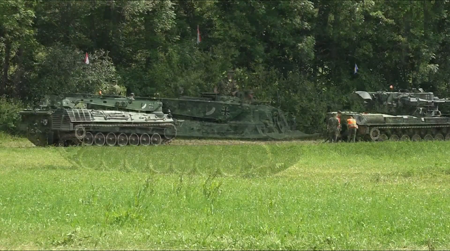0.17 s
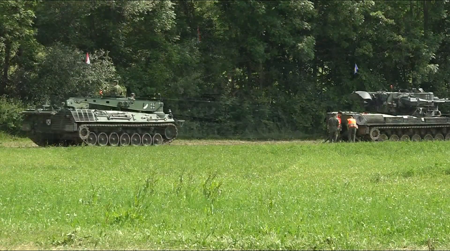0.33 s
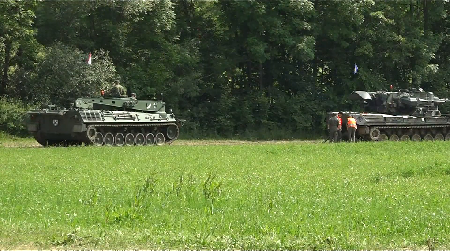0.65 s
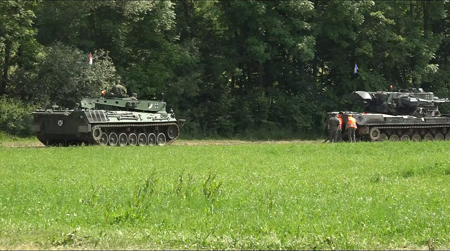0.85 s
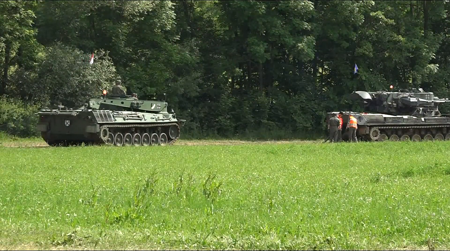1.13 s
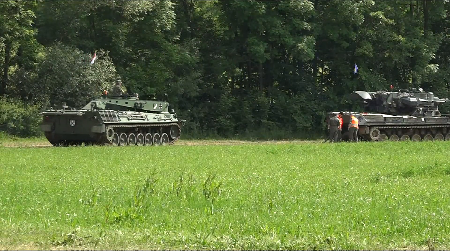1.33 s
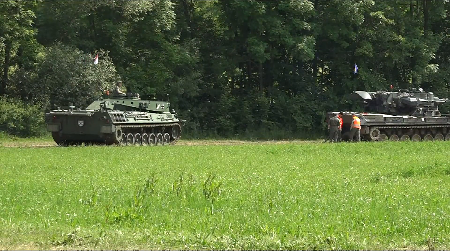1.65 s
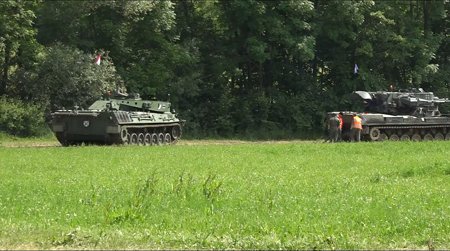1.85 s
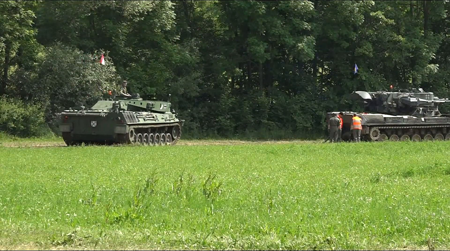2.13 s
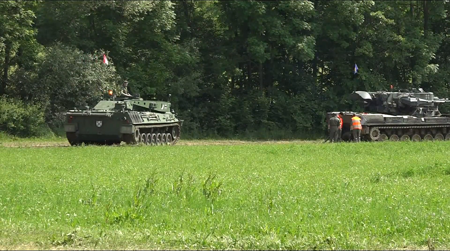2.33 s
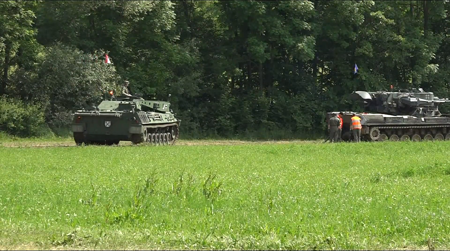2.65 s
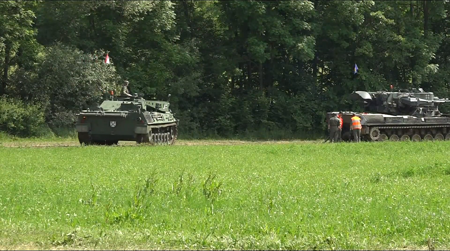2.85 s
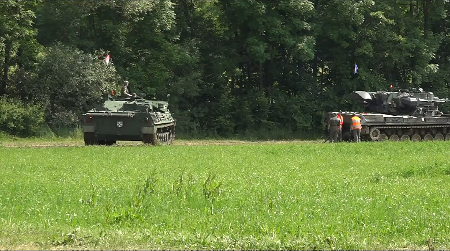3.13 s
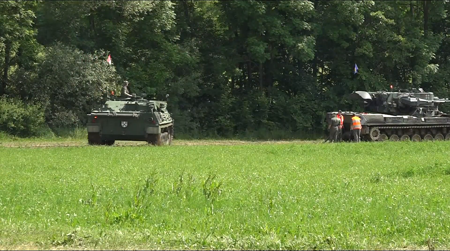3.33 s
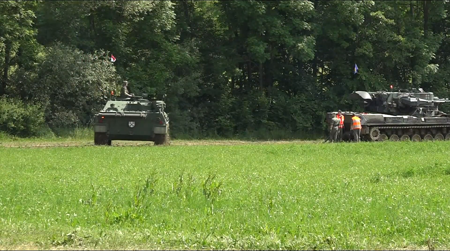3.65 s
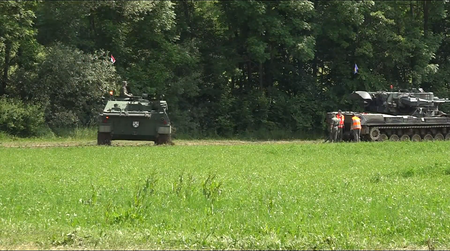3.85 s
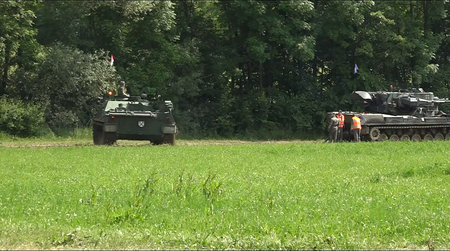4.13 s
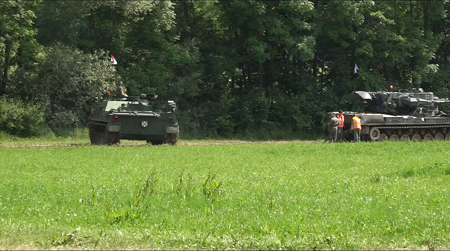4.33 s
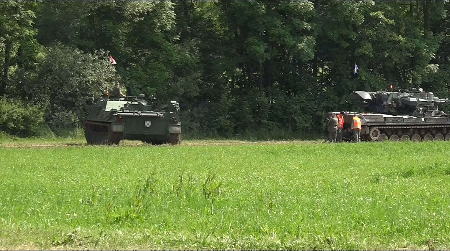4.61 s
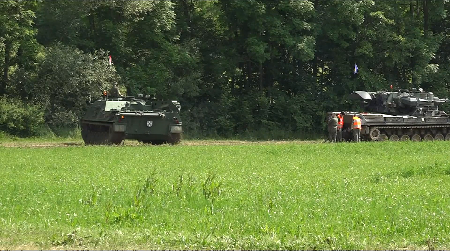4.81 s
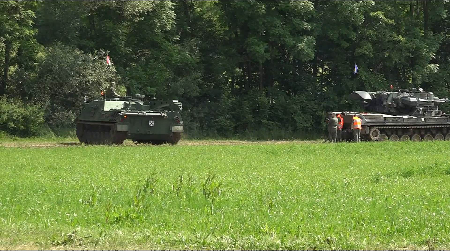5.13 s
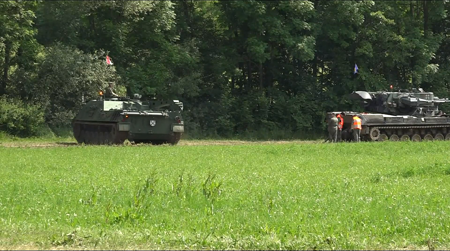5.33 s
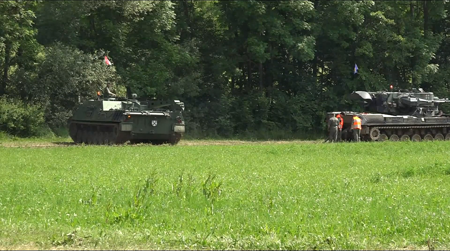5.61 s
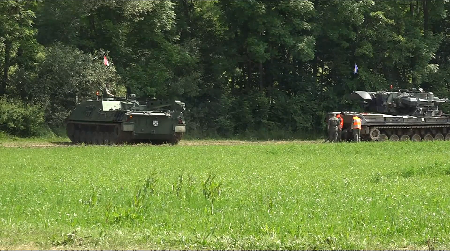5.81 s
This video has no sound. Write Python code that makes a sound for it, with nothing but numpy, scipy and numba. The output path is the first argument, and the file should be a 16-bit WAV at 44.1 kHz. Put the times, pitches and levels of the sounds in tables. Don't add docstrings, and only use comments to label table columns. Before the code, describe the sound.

Loud throaty diesel drone of a turning armoured tracked vehicle outdoors, with rumbling links, metallic slaps, short squeaks and thin whines.

```python
import sys
import numpy as np
from scipy import signal
from scipy.fft import rfft, irfft
from scipy.io import wavfile
from scipy.ndimage import uniform_filter1d
from numba import njit

SR = 44100
rng = np.random.default_rng(int(sys.argv[2]) if len(sys.argv) > 2 else 0)


def transcribe(signal):
    frames = np.atleast_2d(signal).T
    limited = np.clip(frames, -1, 1)
    pcm = np.round(limited * 32767).astype(np.int16)
    wavfile.write(sys.argv[1], SR, pcm)


def ratio(d):
    e = np.asarray(d, float) / 20
    return 10 ** e


N = 263277
TIME = np.arange(N) / SR


def curves(table):
    s, *columns = np.transpose(table)
    return [np.interp(TIME, s, c) for c in columns]


def colour(table, hz):
    f, value = np.transpose(table)
    return np.interp(np.log(hz + 1e-9), np.log(f), value)


def hump(centre_s, width_s):
    return np.exp(-((TIME - centre_s) / width_s) ** 2)


def nearness(fade_s=0.49):
    return np.clip(1 - TIME / fade_s, 0, 1)


def walk(rate):
    k = int(SR / rate)
    held = np.repeat(rng.standard_normal(N // k + 1), k)
    return 1.313 * uniform_filter1d(uniform_filter1d(held, k), k)[:N]


@njit
def svf(x, hz, width):
    y, b, l = np.empty(len(x)), 0., 0.
    for i in range(len(x)):
        g, k = np.tan(np.pi * hz[i] / SR), width / hz[i]
        v = (b + g * (x[i] - l)) / (1 + g * (g + k))
        b, l, y[i] = 2 * v - b, l + 2 * g * v, k * v
    return y


# f/Hz, share of unrelated noise
INCOHERENCE = [(60, .06), (230, 0.053), (450, 0.27), (900, 0.19), (1750, .12), (3400, 0.28), (6700, 0.08)]


def hush(spectrum, lo_hz, hi_hz):
    hz = np.fft.rfftfreq(N, 1 / SR)
    mid, side = rfft(rng.standard_normal((2, N))) * ratio(colour(spectrum, hz))
    side = side * colour(INCOHERENCE, hz)
    scale = np.sqrt(2 * np.sum(np.abs(mid[(hz >= 250) & (hz < 2500)]) ** 2)) / N
    band = (hz >= lo_hz) & (hz < hi_hz)
    return irfft(np.array([mid + side, mid - side]) * band, N) / scale


def tone(hz, db, wobble_hz):
    return np.sqrt(2) * ratio(db) * np.sin(2 * np.pi * np.cumsum(hz + wobble_hz * walk(25)) / SR)


# t/s, level/dB of the gas roar
EFFORT = [(0, -30.5), (.12, -32), (.4, -30.5), (.78, -26.5), (1.15, -27), (1.4, -28.5), (1.95, -28),
          (2.2, -25.5), (2.45, -26.5), (2.95, -28.5), (3.5, -29), (4.2, -28.5), (4.65, -32), (4.9, -31.5),
          (5.97, -34)]


def effort_db():
    return curves(EFFORT)[0]


def links(per_s=45, low_hz=1200, high_hz=5200, db=-48):
    out, ring = np.zeros(N + SR), np.arange(int(.06 * SR)) / SR
    for when, pitch, size, damp in rng.random((600, 4))[:int(per_s * N / SR)]:
        hz = low_hz * (high_hz / low_hz) ** pitch
        shape = np.sin(np.pi * ring / ring[-1]) ** .5 * np.exp(-ring / (0.025 + 0.03 * damp))
        level = ratio(db - 6 * pitch - 3.0 * np.log(size))
        out[int(when * N):][:len(ring)] += level * shape * np.sin(2 * np.pi * hz * ring)
    return out[:N] * ratio(effort_db() + 34.5)


# t/s, level/dB
RATTLES = [(0.6753, -21), (0.9574, -23), (1.28, -33), (1.6048, -25.5), (1.7025, -23.5), (1.7494, -22),
           (1.9101, -25.5), (1.9814, -21), (2.1066, -21), (2.1864, -21), (2.2842, -17.5), (2.353, -18),
           (2.4255, -24), (2.4713, -21), (2.5626, -20.5), (2.6534, -23)]


def rattles():
    burst = np.zeros(N)
    for s, db in RATTLES:
        peak_s = s + .004
        slope_s = np.where(TIME < peak_s, .003, .011)
        burst += ratio(db - 6) * np.exp(-np.abs(TIME - peak_s) / slope_s)
    return burst * hush([(900, -1.5), (2000, 1), (4000, -1), (7000, -13)], 650, 9000)


# t/s, duration/s, start f/Hz, end f/Hz, level/dB
SQUEAKS = [(.29, .12, 2720, 3540, -38), (.52, 0.054, 2960, 2950, -41), (.834, .04, 3370, 2915, -34),
           (.96, 0.019, 3000, 2900, -45), (1.277, 0.025, 3200, 2950, -41), (1.33, .031, 3080, 3050, -35.5),
           (1.424, 0.041, 3367, 3460, -36.5), (1.516, .037, 3450, 2900, -40),
           (1.905, 0.057, 2880, 2800, -33.5), (3.95, 0.049, 2700, 2920, -38), (4.45, .04, 3740, 3640, -41),
           (4.888, .058, 2790, 2880, -38.5), (5.2, 0.13, 3666, 3690, -39), (5.92, .05, 4300, 4550, -40.5)]
# t/s, duration/s, foot f/Hz, top f/Hz, level/dB
ARCHES = [
    (.68, .195, 2750, 4230, -35.5),
    (.703, .14, 3330, 3900, -42),
]


def squeaks():
    out, flutter, grip_db = np.zeros(N), walk(220), 1.5 * walk(90)
    notes = [(s, l, a, (a + b) / 2 + .3 * (b - a), b, db) for s, l, a, b, db in SQUEAKS]
    notes += [(s, l, foot, top, foot, db) for s, l, foot, top, db in ARCHES]
    for s, length, start_hz, top_hz, end_hz, db in notes:
        i = slice(int(s * SR), min(int((s + length) * SR), N))
        u = np.clip((TIME[i] - s) / length, 0, 1)
        arch = np.abs(np.sin(np.pi * u))
        bend = arch ** .6 * (top_hz - (start_hz + end_hz) / 2)
        hz = start_hz + u * (end_hz - start_hz) + bend + flutter[i] * (25 + .11 * bend)
        wave = np.sqrt(2) * np.sin(2 * np.pi * np.cumsum(hz) / SR)
        out[i] += ratio(db + grip_db[i]) * arch ** .4 * wave
    return out


# f/Hz, level/dB per Hz
RUMBLE = [(28, -24), (50, -9), (90, 6), (170, -2), (250, 0), (350, -3), (470, -13), (600, -15.5),
          (760, -19)]


def tracks():
    behind = np.clip((TIME - 2.4) / 2.5, 0, 1)
    upper_db = -5 + 11 * nearness() ** 0.21 + 3.5 * behind
    shift_db = 2.5 * np.sqrt(nearness())
    shift_db -= 3 * hump(2.85, 0.45)
    shift_db += 5 * hump(5.7, .35)
    low = hush(RUMBLE, 20, 450) * ratio(shift_db + 1.8 * walk(6))
    upper = hush(RUMBLE, 450, 800) * ratio(upper_db + 4 + 1.5 * walk(9))
    return ratio(effort_db() - 2.5) * (low + upper)


# t/s, f/Hz, level/dB
BLOWER = [(0, 780, -49.5), (.6, 789, -37), (1.4, 816, -39), (2.2, 856, -35), (3.08, 908, -41.5),
          (3.25, 928, -32.5), (3.48, 942, -29), (3.62, 951, -40.5), (4.4, 1006, -43.5), (4.6, 1005, -37.5),
          (5, 1009, -35), (5.45, 1007, -41), (5.7, 993, -37), (5.97, 993, -36.5)]
# t/s, f/Hz, level/dB
GEARS = [(0, 1957, -39), (.4, 1957, -41), (1.1, 1958, -38), (2.5, 1958, -42), (3.4, 1959, -41),
         (4.1, 1960, -42), (4.7, 1973, -40), (5.97, 1970, -41)]
# f/Hz, level/dB
FAN_LINES = [(603, -45.5), (689, -48), (3110, -53.5), (3300, -47)]
# f/Hz, level/dB
NEAR_LINES = [(468, -35), (562, -39.5), (231.6, -33.5), (386, -40), (317, -44.5)]


def whines():
    blower_db = (2.8 - 2 * hump(3.38, .25)) * walk(12) - 1.5
    out = tone(*curves(BLOWER), wobble_hz=np.where(TIME < 3, 11, 5)) * ratio(blower_db)
    hz, db = curves(GEARS)
    out += tone(hz, db + 2.0 * walk(22), wobble_hz=4.5)
    out += tone(hz - 29, db - 4.5 + 5.4 * walk(15.0), wobble_hz=5)
    behind_db = -9 * np.clip(np.abs(TIME - 4.6) / 1.0, 0, 1) ** 2
    out += sum(tone(f, db + behind_db + 0.83 * walk(6.1), wobble_hz=4) for f, db in FAN_LINES)
    near = sum(tone(f * (1.03 - .15 * TIME), db + 2.5 * walk(20), wobble_hz=9) for f, db in NEAR_LINES)
    return out + nearness(.4) * near


# f/Hz, level/dB per Hz
ROAR = [(700, -15), (800, -3.5), (1000, -3), (1200, -6), (1500, -4), (2000, -3), (2900, -10), (4000, -10.5),
        (5000, -14), (5700, -17.5), (6500, -26.5), (7600, -30.5)]
# f/Hz, bandwidth/Hz, level/dB
HULL = [(852, 49, 2.5), (1053, 33, 7), (1361, 91, 5.5), (1802, 58, -1)]


def hull_ring():
    air = hush([(100, 0), (9000, 0)], 400, 3000)
    ring = 0
    for f, width, db in HULL:
        hz = f * (1 + 0.019 * walk(1.7))
        mode = np.array([svf(svf(c, hz, 1.2 * width), hz, 1.2 * width) for c in air])
        ring += ratio(db + 2.5 * walk(7.3)) * mode
    return ring


def gas(turns):
    strain = hump(2.3, 0.12)
    louvres_db = -3.5 * nearness(2.2)
    hiss_db = -5.5 - nearness() + louvres_db + 1.5 * strain
    depth = np.clip(.1 + .15 * strain, 0, 1)
    beat = 5 * turns
    puff_sizes = ratio(np.clip(4 * rng.standard_normal((2, N // 200)), -8, 5))
    size = puff_sizes[:, (beat + 2).astype(int)]
    puff = 1 + depth * (size * (1 - np.cos(2 * np.pi * beat)) ** 2 / 1.75 - 1)
    roar = puff[0] * hush(ROAR, 600, 1500) * ratio(1.0 * walk(17))
    roar += puff.mean(axis=0) * hush(ROAR, 1500, 2500) * ratio(0.86 * walk(12))
    edges_hz = [2500, 2900, 3350, 3900, 4500, 5200, 9000]
    patches = sum(hush(ROAR, lo, hi) * ratio(1.5 * walk(18)) for lo, hi in zip(edges_hz, edges_hz[1:]))
    cylinder_db = 0.68 * np.cos(2 * np.pi * turns)
    hiss = puff[1] * patches * ratio(hiss_db + 5.5 + 0.55 * walk(8.8) + cylinder_db)
    flank = np.clip((TIME - .5) / 0.18, 0, 1) * np.clip((3.1 - TIME) / 2.1, .2, 1)
    return ratio(effort_db()) * (roar + hiss + puff[0] * ratio(3.5) * flank * hull_ring())


# t/s, firing f/Hz
SPEED = [(0, 65.5), (.45, 56.3), (.75, 64.3), (.95, 73.6), (1.15, 77.85), (1.6, 80.9), (2.1, 78.45),
         (2.25, 79.9), (2.45, 86.7), (2.85, 89.8), (3.15, 90.95), (3.32, 84.85), (3.6, 88.2), (4.2, 95.7),
         (4.4, 89.4), (4.65, 80.9), (5.3, 73.3), (5.97, 67.5)]


def crankshaft():
    hz = curves(SPEED)[0]
    return hz, np.cumsum(hz) / SR / 10 - 0.1493


def groups(hz, bank_db):
    pull = hump(0.66, 0.54)
    lumpy_db = -27.5 + 0.02 * (np.maximum(hz, 72) - 77.2) + 8 * pull
    idle, lug = ratio(-31), ratio(-32) * hump(5.7, .35)
    bark = ratio(bank_db - 9.5) + idle + ratio(-21) * pull + lug
    return lumpy_db, 20 * np.log10(bark)


# t/s, bank beat level/dB, firing level/dB
OUTLETS = [(0, -34, -31.5), (.5, -29.5, -24), (.95, -16, -10), (1.4, -21.5, -10.5), (1.7, -19.5, -18),
           (2.05, -24.5, -16), (2.23, -16, -10.5), (2.45, -12.5, -16), (2.75, -12.5, -21),
           (3.12, -14, -18.5), (3.3, -25, -24), (3.5, -12.5, -27), (4.1, -13.5, -14), (4.25, -14, -14.5),
           (4.45, -31.5, -15), (4.9, -30.5, -13), (5.5, -43.5, -10.5), (5.97, -46, -12.5)]
THROB = [-60, -42, -26.5, -25, -34]
LUMPY = [-8, -0.5, -2.5, -16]
BARK = [-21.5, -2.5, -5, -5.5, -2.5, -16, -8.5, -4.5, -7.5, -5, -16.5, -9.5, -5.5, -8, -12]
NEAR_LUMPY = [-9, -10.5, 2, -2.5]
# f/Hz, level/dB
PIPE = [(60, -9.5), (80, 4.5), (105, -2), (130, -11.5), (150, -1.5), (175, 3.5), (200, -4), (250, -4),
        (300, -27)]


def exhaust(turns, hz):
    def order(k, db, flutter_db, lag):
        return np.sqrt(2) * ratio(db + flutter_db * walk(5.5)) * np.cos(2 * np.pi * (k * turns - lag))

    def pipe_db(k):
        return colour(PIPE, k * hz / 10)

    bank_db, fire_db = curves(OUTLETS)
    lumpy_db, bark_db = groups(hz, bank_db)
    near = nearness(1)
    out = order(5, bank_db, .3, .15)
    null_s = 3.45
    out += np.tanh((null_s - TIME) / .05) * order(10, fire_db, .3, .25 - .13 * (TIME > null_s))
    out += sum(order(k, db - 17.5 * near, 1.0, 0.22) for k, db in zip((4, 6, 7, 8, 9), THROB))
    for k, db, near_db in zip((11, 12, 13, 14), LUMPY, NEAR_LUMPY):
        out += order(k, db + near_db * np.sqrt(near) + lumpy_db + pipe_db(k), 0.83, 0.11)
    out += order(15, -26.5 + np.minimum(bank_db + 20, 0) * 0.59, 1.5, 0)
    for k, db in zip(range(16, 31), BARK):
        out += order(k, db + bark_db - 9 + pipe_db(k), 2.1, rng.random())
    return out


def scene():
    hz, turns = crankshaft()
    background = links() + rattles() + squeaks() + tracks() + whines()
    return background + gas(turns) + exhaust(turns, hz)


# f/Hz, level/dB
LEFT_OVER_RIGHT = [(40, -4), (65, -4.5), (100, -9), (170, -4), (290, 2), (490, -4), (830, 2), (1400, 2.5),
                   (2360, 2), (4000, 0), (6750, 8)]


def capsules(dry):
    half_db = colour(LEFT_OVER_RIGHT, np.fft.rfftfreq(N, 1 / SR)) / 2
    gains = ratio(np.array([half_db, -half_db]))
    return np.tanh(0.57 * irfft(rfft(dry) * gains / gains.mean(axis=0), N)) / 0.57


# from f/Hz, to f/Hz, level/dB needed
TOP_BANDS = [(5680, 5950, -60), (5950, 6230, -58), (6230, 6550, -50), (6550, 6900, -49), (6900, 7500, -42),
             (7500, 23000, 0)]
# t/s, duration/s, level/dB
SPARE = [(0, .06, 8), (.2, .62, 10), (.58, .13, 10), (.78, .04, 10), (.87, .1, 7), (1.08, .3, 8),
         (1.5, .35, 3), (2.08, .3, 12), (2.46, .04, 9), (2.89, .1, 7), (3.16, .4, 9), (3.65, 1.9, 8),
         (4.2, .7, 2), (4.12, .045, 20), (4.33, .04, 10), (4.58, .09, 10), (5.58, .25, 14), (5.83, .14, 8)]


def top_gate(wet):
    hz, s, frames = signal.stft(wet, SR, nperseg=2048, noverlap=1024)
    treble = np.sum(np.abs(frames[0, (hz > 4500) & (hz < 5680)]) ** 2, axis=0)
    treble_db = 10 * np.log10(treble + 1e-12)
    burst_db = treble_db - uniform_filter1d(treble_db, size=25)
    spare_db = sum(db * ((s >= start) & (s < start + length)) for start, length, db in SPARE)
    scatter_db = 4 * uniform_filter1d(rng.standard_normal(len(s)), size=2)
    top_db = -65.5 + 1.2 * burst_db + spare_db + scatter_db
    for lo_hz, hi_hz, need_db in TOP_BANDS:
        is_open = top_db + 1.5 * rng.standard_normal(len(s)) > need_db
        frames[:, (hz > lo_hz) & (hz <= hi_hz)] *= is_open
    return signal.istft(frames, SR, nperseg=2048, noverlap=1024)[1][:, :N]


def low_pass(x):
    return signal.sosfilt(signal.butter(12, 7350, fs=SR, output="sos"), x)


def record(dry):
    mix = np.clip(top_gate(capsules(dry)), -1, 1)
    return low_pass(mix)


dry = scene()
out = record(dry)
transcribe(out)
```